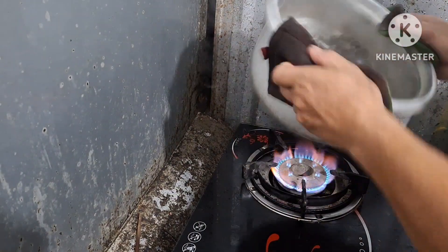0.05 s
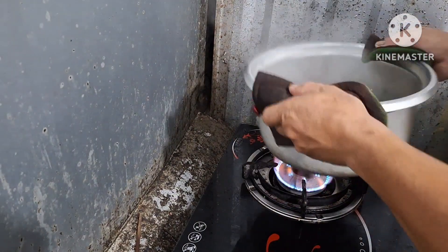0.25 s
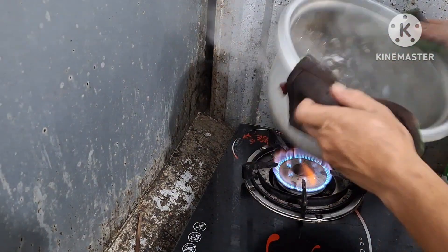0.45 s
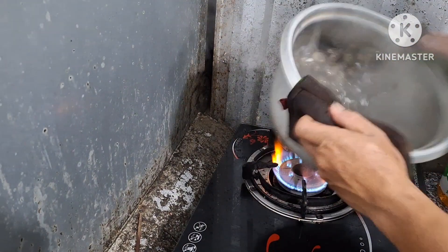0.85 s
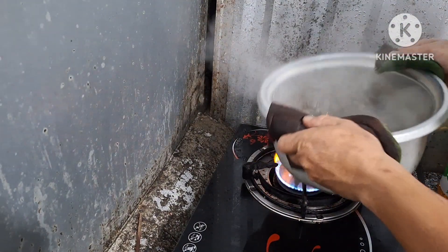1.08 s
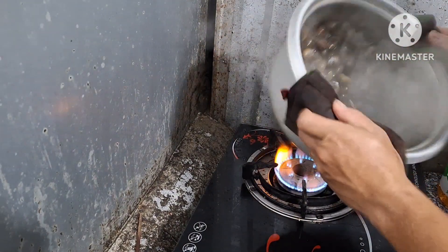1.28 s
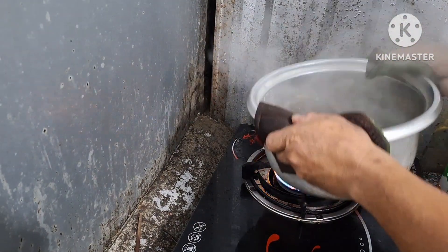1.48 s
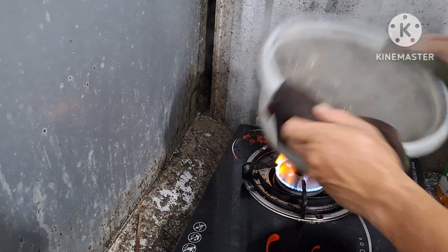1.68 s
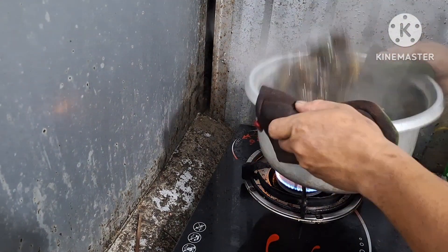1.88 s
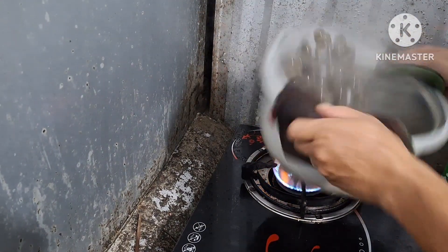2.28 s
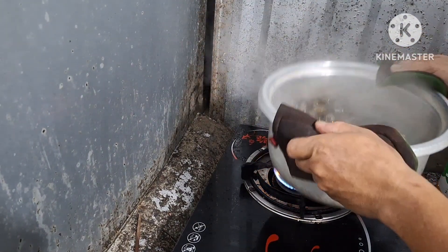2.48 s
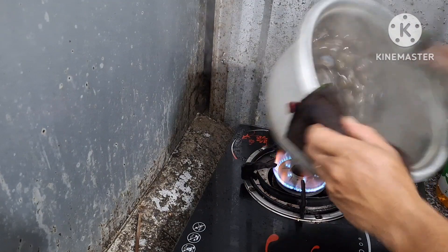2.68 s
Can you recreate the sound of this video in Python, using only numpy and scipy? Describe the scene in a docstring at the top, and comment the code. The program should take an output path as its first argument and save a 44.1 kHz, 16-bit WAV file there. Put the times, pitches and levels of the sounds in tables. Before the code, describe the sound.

Snail shells clatter in a metal pot, tossed six times, landing at about 0.3, 0.7, 1.1, 1.6, 2.1 and 2.5 seconds, with a seventh starting near 2.8. Each toss brings a slide, a briefly ringing knock, a thud and a rattling collapse, with stray clinks and a short echo from hard walls. A gas flame rumbles softly throughout, and a distant engine grows from about 1.6 seconds.

```python
"""Snail shells drum and clatter in a metal pot: six tosses and the start of a seventh.
Each time the heap slides, knocks the damped wall into a brief ring, thuds on the bottom and collapses
shell on shell; stray shells clink. A hard-walled corner echoes it.
Underneath, a gas flame rumbles softly and a distant engine draws nearer."""
import sys
import numpy as np
from scipy import signal
from scipy.fft import rfft, irfft
from scipy.io import wavfile

SR = 44100
rng = np.random.default_rng(int(sys.argv[2]) if len(sys.argv) > 2 else 0)


def wrap_up_sound(samples):
    """Save the sound to the file named by the first command line argument, as 16-bit audio."""
    columns = np.atleast_2d(samples).T
    # keep every value between -1 and 1, then stretch to whole-number steps
    tamed = np.clip(columns, -1, 1)
    steps = np.round(tamed * 32767).astype(np.int16)
    wavfile.write(sys.argv[1], SR, steps)


N = 125685

# Spectra. Each row: frequency in Hz, relative level in dB.
FLAME_HZ_DB = [(20, -35), (40, -17), (60, 0), (110, 3), (155, -10.5), (210, -1), (280, -10), (600, -16.5),
               (1500, -21.5), (3000, -33.5), (6000, -40), (16000, -49)]
EXHAUST_HZ_DB = [(25, -26), (70, 6.5), (130, -2), (300, -5), (700, -8), (2000, -10.5), (5000, -20.5),
                 (16000, -42)]
CLINK_HZ_DB = [(200, -25), (1500, -9), (2800, -5), (4200, -1), (5200, 11), (6300, 0), (8000, 4.5),
               (9500, -8.5), (13000, -5), (16000, -13)]
SKITTER_HZ_DB = [(200, -26), (1500, -7), (2200, -8), (2800, 0), (4200, -3), (5200, 0.5), (6300, -5),
                 (8000, -0.5), (9500, -9.5), (13000, -11), (16000, -18)]
KNOCK_HZ_DB = [(100, -29), (200, -26), (340, -20), (450, -13), (660, 1.5), (850, 0.5), (1080, -1),
               (1300, -7), (2200, -10.5), (5000, -16), (16000, -54)]
THUD_HZ_DB = [(60, -24.5), (180, -25), (290, -14), (350, -13.5), (425, -1), (540, 3.5), (670, 1),
              (800, -14), (1500, -19.5), (8000, -62)]
CLATTER_HZ_DB = [(150, -49), (450, 7.5), (1200, -3), (2000, -2.5), (3000, 1), (4200, -1.5), (5100, 1.5),
                 (6300, -4.5), (8000, -0.5), (9500, -8), (12500, -8.5), (16000, -12.5)]
# Right microphone. Each row: frequency in Hz, gain over the left in dB.
RIGHT_MIC_HZ_DB = [(100, -3), (350, -1), (600, -1), (1200, 0), (7000, 0), (8200, -1), (9200, 4.5),
                   (13000, 4.5), (16000, -5)]
# Level curves. Each row: time in seconds, relative level in dB.
FLAME_S_DB = [(0, 2), (.3, 1), (.55, -3), (.9, -0.5), (1.15, -4), (1.4, -1.5), (1.8, 1.5), (2.85, 0.5)]
ENGINE_S_DB = [(0, -51), (.9, -54.5), (1.2, -59), (1.6, -46), (1.9, -44), (2.15, -43), (2.3, -38.5),
               (2.85, -40.5)]
# Engine speed. Each row: time in seconds, firing rate in Hz.
FIRING_S_HZ = [(0, 42.4), (1.8, 42), (2.3, 45.2), (2.7, 43.3), (2.85, 46)]
# Engine tones. Each row: multiple of the firing rate, relative level in dB.
ENGINE_ORDER_DB = [(1, -1), (2, -1), (3, -8), (4, -13.5), (5, -6.5), (9, -11), (11, -9)]
# Lone shells: hard clinks, knocks on the bare wall. Each row: start in seconds, relative level in dB.
CLINKS_S_DB = [(0.154, -24), (0.253, -2), (0.3872, -1), (0.4423, -11.5), (.594, -19), (.720, -3),
               (0.8645, -8), (0.987, -17.5), (1.454, -21.5), (1.4628, -10), (1.4759, -6), (1.693, -9),
               (1.723, -7), (1.7689, -3.5), (1.944, -6), (2.123, -3), (2.265, -7), (2.269, -8), (2.28, -15),
               (2.331, -13)]
KNOCKS_S_DB = [(.255, -6), (0.647, -4.5), (0.68, 0), (.82, -10.5), (1.018, -8.5), (1.186, -10),
               (1.963, -11.5), (2.386, -4.5), (2.418, -0.5)]
# Loose shells sliding. Each row: middle in seconds, relative level in dB, length in seconds.
SLIDE_SWELLS = [(0.161, -36, .012), (.205, -33, .025), (0.441, -27, .08), (0.607, -31, .028),
                (0.994, -34, .022), (1.035, -26, .015), (1.411, -45, .03), (1.483, -23, .04),
                (1.73, -26, .1), (1.899, -45.5, .05), (1.968, -24, 0.035), (2.309, -38.5, .08),
                (2.408, -23, 0.024), (2.701, -37.5, 0.036)]
# The heap hits the wall, thuds on the bottom, collapses.
# Each row: peak time in seconds, relative level in dB, rise in dB/s, fall in dB/s.
WALL_SWELLS = [(.26, -17, 480, 220), (.692, -16, 350, 210), (1.068, -16, 560, 170), (1.54, -14.5, 400, 180),
               (2.018, -13, 370, 260), (2.44, -15, 400, 210), (2.88, -22.5, 400.5, 190)]
THUD_SWELLS = [(.255, -20, 1000, 650), (.688, -19, 600, 290), (1.08, -18.5, 320, 280),
               (1.583, -19, 320, 220), (2.06, -18, 239.5, 240), (2.472, -22, 230, 340),
               (2.87, -26, 502, 257)]
COLLAPSE_SWELLS = [(.27, -14.5, 420, 195), (.732, -12.5, 225, 175), (1.11, -13.5, 260, 205),
                   (1.58, -14, 260, 190), (2.078, -14, 190, 210), (2.485, -14.5, 205, 235),
                   (2.93, -17.5, 260, 200)]
# Pot wall modes. Each row: frequency in Hz, relative level in dB, T60 in seconds.
POT_MODES = [(426, -6.5, 0.097), (463, -13, 0.12), (530, -6.5, 0.16), (602, -1.5, 0.094), (671, 5.5, 0.13),
             (742.7, 3.5, 0.15), (808, -1, 0.11), (861.5, 2, 0.13), (953, 1.5, .14), (1075.7, 0, 0.1),
             (1354, -4, .14), (1673, -8, 0.15), (2057, -9.5, 0.09), (2857, -18, 0.064)]


def undb(db):
    """Decibels to gain."""
    return 10 ** (np.asarray(db) / 20)


def unit(x):
    """Scale to unit energy."""
    return x / np.sqrt(np.sum(x ** 2, axis=-1, keepdims=True))


def fade(t60_s, size):
    """Exponential decay over size samples."""
    return np.exp(-np.log(1000) * np.arange(size) / SR / t60_s)


def burst(t60_s, shape):
    """Decaying noise of unit energy."""
    noise = rng.standard_normal(shape)
    return unit(noise * fade(t60_s, noise.shape[-1]))


def convolve(x, response):
    """Apply an impulse response; keep N samples."""
    return signal.fftconvolve(np.atleast_2d(x), np.atleast_2d(response), axes=-1)[:, :N]


def colour(hz_db, size=2048):
    """Minimum-phase impulse response of a spectrum."""
    hz, db = np.array(hz_db, float).T
    bins_hz = np.arange(size // 2 + 1) * SR / size
    gain = undb(np.interp(np.log(bins_hz + 1), np.log(hz), db))
    cepstrum = irfft(np.log(gain))
    cepstrum[1:size // 2] *= 2
    cepstrum[size // 2 + 1:] = 0
    return irfft(np.exp(rfft(cepstrum)))


def curve(t, points):
    """Interpolate (time, value) rows."""
    return np.interp(t, *np.array(points).T)


def wander(rate_hz):
    """Slow random drift, spread near 1."""
    return np.interp(np.arange(N) / SR * rate_hz, np.arange(400), rng.standard_normal(400))


def rumble(hz_db, split_hz=900):
    """Coloured noise: mono in the bass, uncorrelated in the treble."""
    mid, side = convolve(rng.standard_normal((2, N)), unit(colour(hz_db)))
    side = signal.lfilter(*signal.butter(1, split_hz, "high", fs=SR), side)
    return np.array([mid + side, mid - side])


def burner(t, gain_db=-42.5, flutter_db=3.5):
    """Gas flame: fluttering rumble, faint hiss."""
    return rumble(FLAME_HZ_DB) * undb(gain_db + curve(t, FLAME_S_DB) + flutter_db * wander(11.36))


def engine(t, exhaust_db=1.5, flutter_db=2.2):
    """Distant engine, nearing and speeding up slightly: firing tones over exhaust noise."""
    firing_hz = curve(t, FIRING_S_HZ) * (1 + 0.0031 * wander(7.95))
    phase = 2 * np.pi * np.cumsum(firing_hz) / SR
    tones = 0
    for order, db in ENGINE_ORDER_DB:
        amplitude = np.sqrt(2) * undb(db + flutter_db * wander(8.97))
        tones += amplitude * np.sin(order * phase + 2 * np.pi * rng.random())
    return (tones + undb(exhaust_db) * rumble(EXHAUST_HZ_DB)) * undb(curve(t, ENGINE_S_DB))


def cavity(size, t60_s=0.041):
    """Quick stereo reflections inside the pot."""
    return burst(t60_s, (2, size))


def corner(x, wet_db, cavity_db, split_hz=4000, size=SR // 2):
    """Direct sound, pot reflections and the corner's tail, whose treble dies first."""
    low, high = rng.standard_normal((2, 2, size))
    lowpass = signal.butter(1, split_hz, fs=SR)
    bass = signal.lfilter(*lowpass, low) * fade(.35, size)
    treble = (high - signal.lfilter(*lowpass, high)) * fade(.25, size)
    tail = unit((bass + treble) * (1 - fade(.01, size)))
    response = undb(cavity_db) * cavity(size) + undb(wet_db) * tail
    response[:, 0] += 1
    return convolve(x, unit(response))


def clinks(gain_db=6.5, bounce_s=.002, bounce_db=-4, crack_t60_s=.0059, echo_db=-1, size=2048):
    """Stray shells strike brightly and bounce once, each with its own pot reflections."""
    strikes = 0
    for start_s, db in CLINKS_S_DB:
        blows = np.zeros(N)
        blows[int(start_s * SR)] = undb(db)
        rebound_s = start_s + bounce_s * rng.uniform(.5, 2)
        blows[int(rebound_s * SR)] += undb(db + bounce_db)
        crack = unit(burst(crack_t60_s, (2, size)) + undb(echo_db) * cavity(size))
        strikes += convolve(blows, crack)
    bright = convolve(strikes, unit(colour(CLINK_HZ_DB)))
    return undb(gain_db) * corner(bright, wet_db=-0.5, cavity_db=-7)


def impacts(power, peak_per_s, thinning=.3, range_db=12):
    """Irregular impulses, denser and harder as power grows."""
    chance = peak_per_s / SR * (power / power.max() + 1e-9) ** thinning
    jitter, softness, sign = rng.random((8000, 3)).T
    starts = np.searchsorted(np.cumsum(chance), np.arange(len(jitter)) + 2 * jitter)
    strength = undb(-range_db * softness) * np.sign(sign - .5)
    hits = np.bincount(starts, strength / np.sqrt(np.mean(strength ** 2)), N + 1)[:N]
    return hits * np.sqrt(power / chance)


def placed(response, max_lag_s):
    """A random spot in the pot: sound reaches the two microphones at different times."""
    lag = rng.uniform(-0.9, 1) * max_lag_s * SR / 2
    size = len(response) + 256
    delay_samples = 64 + np.array([[lag], [-lag]])
    shift = np.exp(-2j * np.pi * np.arange(size // 2 + 1) * delay_samples / size)
    return irfft(rfft(response, size) * shift)


def shell(t, t60_at_5khz_s=.021, crack_t60_s=.0073, crack_db=-1.5, cavity_db=-2, count=9, size=2048):
    """One shell's click: a crack, a few short modes, pot reflections."""
    hz = 1200 + 14000 * (np.arange(count) + rng.random(count))[:, None] / count
    modes = unit(np.sin(2 * np.pi * hz * t[:size]) * fade(t60_at_5khz_s * np.sqrt(5000 / hz), size))
    click = unit(unit(modes.sum(axis=0)) + undb(crack_db) * burst(crack_t60_s, size))
    click = placed(click, max_lag_s=.00014)
    return unit(click + undb(cavity_db) * cavity(click.shape[1]))


def rattle(t, power, hz_db, peak_per_s, shells):
    """Unlike shells share one stream of impacts."""
    hits = impacts(power, peak_per_s)
    struck = rng.integers(0, shells, N)
    clicks = sum(convolve(hits * (struck == k), shell(t)) for k in range(shells))
    return convolve(clicks, unit(colour(hz_db)))


def sliding(t, gain_db=-1.5):
    """Loose shells skitter over the metal between landings."""
    power = sum(undb(db) ** 2 * np.exp(-(2 * (t - middle_s) / length_s) ** 2)
                for middle_s, db, length_s in SLIDE_SWELLS)
    skitter = rattle(t, power, SKITTER_HZ_DB, peak_per_s=1200, shells=20)
    return undb(gain_db) * corner(skitter, wet_db=-6, cavity_db=-6.5)


def swells(t, rows, round_s):
    """Summed power of swells: rise and fall linear in dB, top rounded."""
    power = 0
    for peak_s, db, rise, fall in rows:
        distance_s = np.hypot(t - peak_s, round_s) - round_s
        power += undb(db - np.where(t < peak_s, rise, fall) * distance_s) ** 2
    return power


def knocking(hits, hz_db, t60_s=.02, spots=20, size=2048):
    """Short, dull knocks; each spot on the pot sounds a little different."""
    struck = rng.integers(0, spots, N)
    tone = colour(hz_db)
    knocks = 0
    for k in range(spots):
        knock = unit(signal.fftconvolve(burst(t60_s, size), tone)[:size])
        knocks += convolve(hits * (struck == k), placed(knock, max_lag_s=.00032))
    return knocks


def wall_ring(t, hits, width=.56, spots=8, size=SR // 4):
    """The damped wall rings briefly; each spot weights its modes differently."""
    struck = rng.integers(0, spots, N)
    modes = np.array([undb(db) * unit(np.sin(2 * np.pi * hz * t[:size]) * fade(t60_s, size))
                      for hz, db, t60_s in POT_MODES])
    ringing = 0
    for k in range(spots):
        mid, side = rng.standard_normal((2, len(modes)))
        weights = np.array([mid + width * side, mid - width * side])
        ringing += convolve(hits * (struck == k), unit(weights @ modes))
    return ringing


def drumming(t, lone_db=11, ring_db=-4, knock_db=-1.5, thud_db=-0.5):
    """Shells knock on the wall; the heap's weight thuds on the bottom."""
    wall_hits = impacts(swells(t, WALL_SWELLS, round_s=.022), peak_per_s=800)
    for start_s, db in KNOCKS_S_DB:
        wall_hits[int(start_s * SR)] += undb(db + lone_db)
    bottom_hits = impacts(swells(t, THUD_SWELLS, round_s=.012), peak_per_s=600)
    pot = undb(ring_db) * wall_ring(t, wall_hits)
    pot += undb(knock_db) * knocking(wall_hits, KNOCK_HZ_DB)
    pot += undb(thud_db) * knocking(bottom_hits, THUD_HZ_DB)
    return corner(pot, wet_db=-11, cavity_db=-9)


def clatter(t):
    """Shell on shell as the heap collapses after each landing."""
    power = swells(t, COLLAPSE_SWELLS, round_s=.03)
    clicks = rattle(t, power, CLATTER_HZ_DB, peak_per_s=1800, shells=48)
    return corner(clicks, wet_db=-6, cavity_db=-7.5)


def scene():
    """Flame and engine under the tossed shells."""
    t = np.arange(N) / SR
    return burner(t) + engine(t) + clinks() + sliding(t) + drumming(t) + clatter(t)


def record(dry):
    """Brighter right microphone, clipping at full scale, steep low-pass."""
    right = convolve(dry[1], colour(RIGHT_MIC_HZ_DB))[0]
    lowpass = signal.ellip(10, .2, 80, 15700, fs=SR, output="sos")
    return signal.sosfilt(lowpass, np.clip([dry[0], right], -1, 1))


dry = scene()
out = record(dry)
wrap_up_sound(out)
```